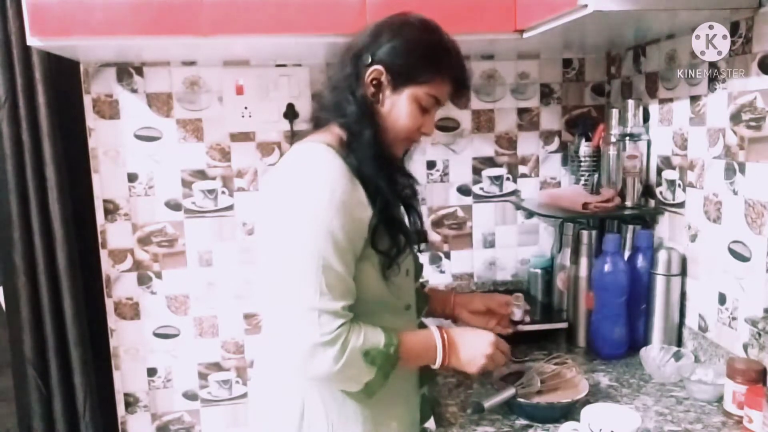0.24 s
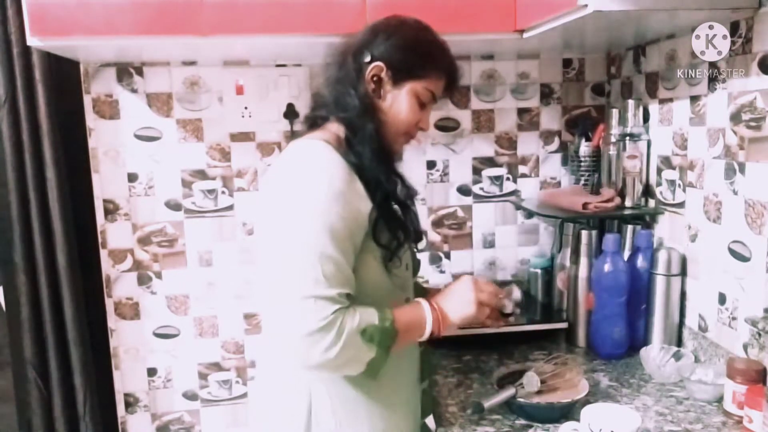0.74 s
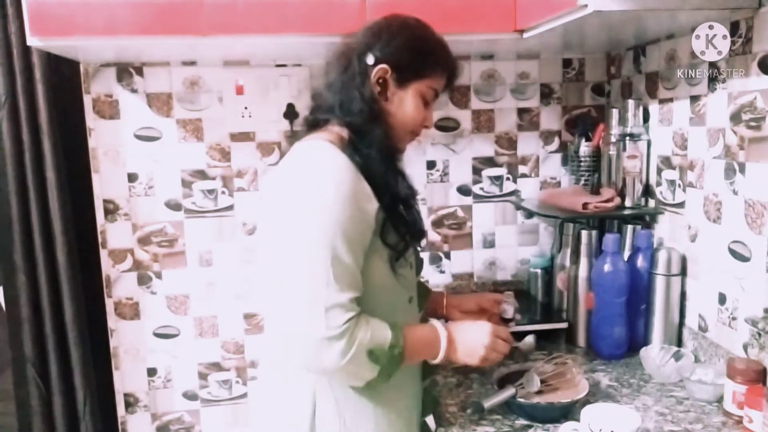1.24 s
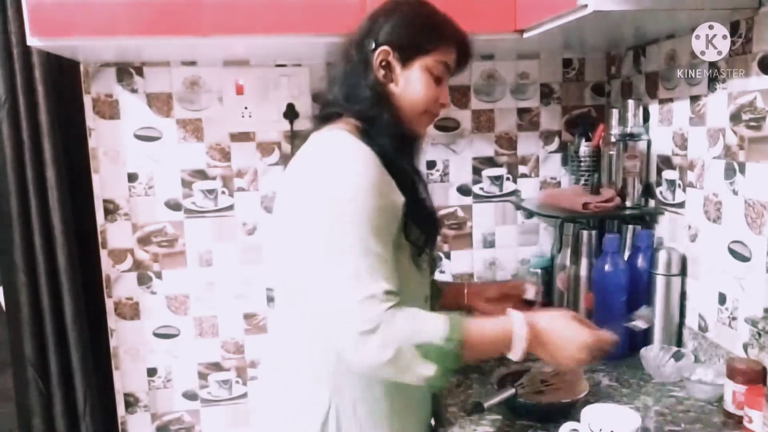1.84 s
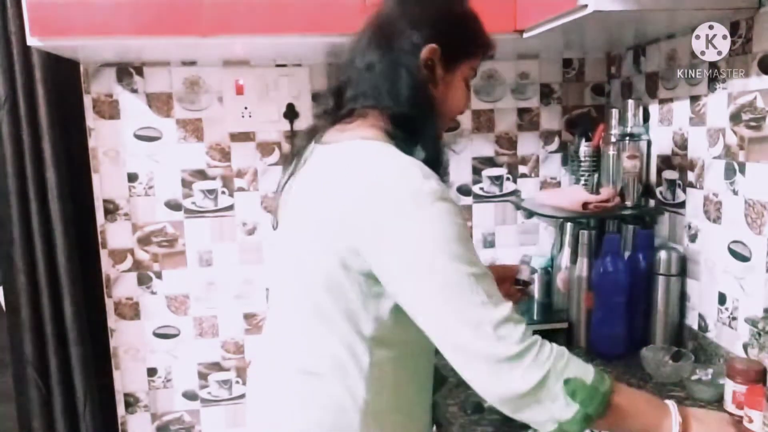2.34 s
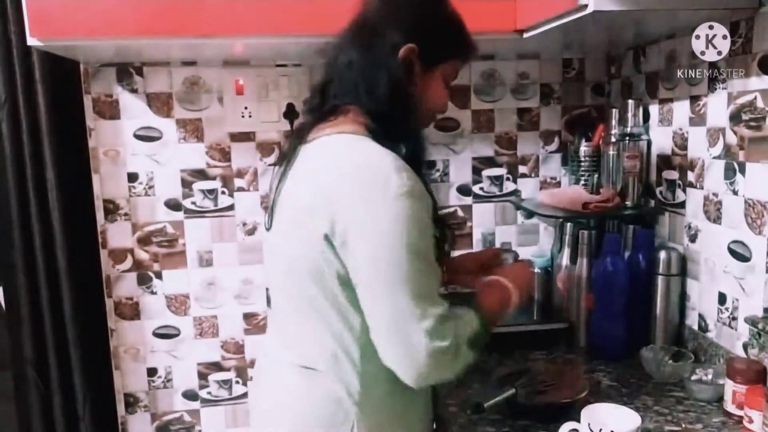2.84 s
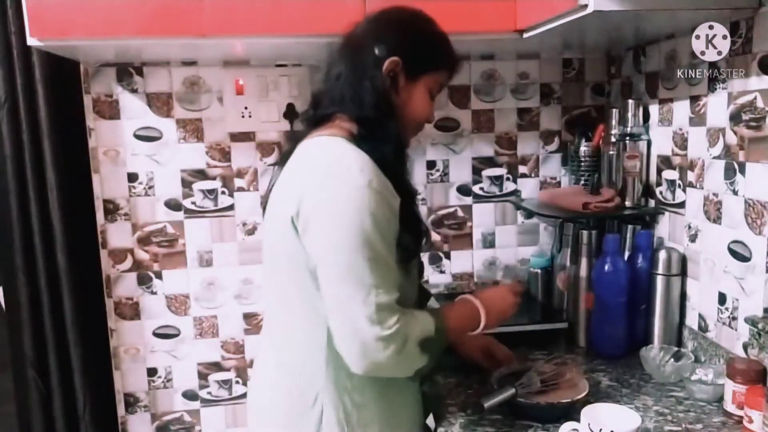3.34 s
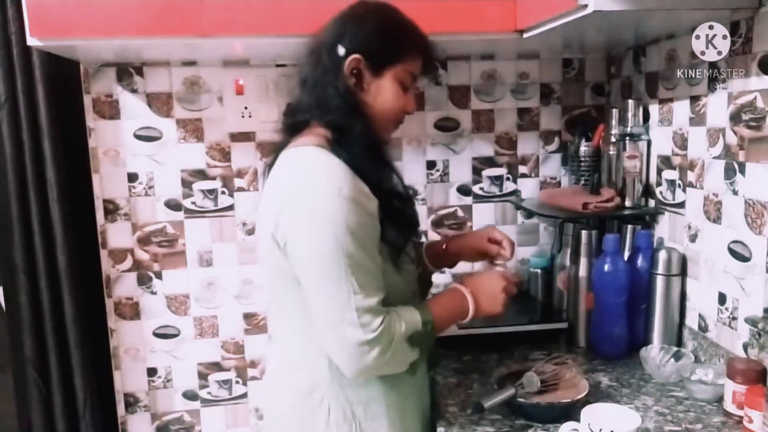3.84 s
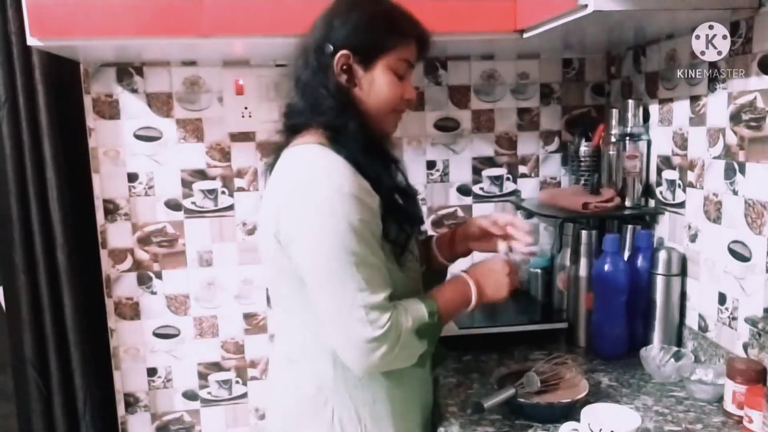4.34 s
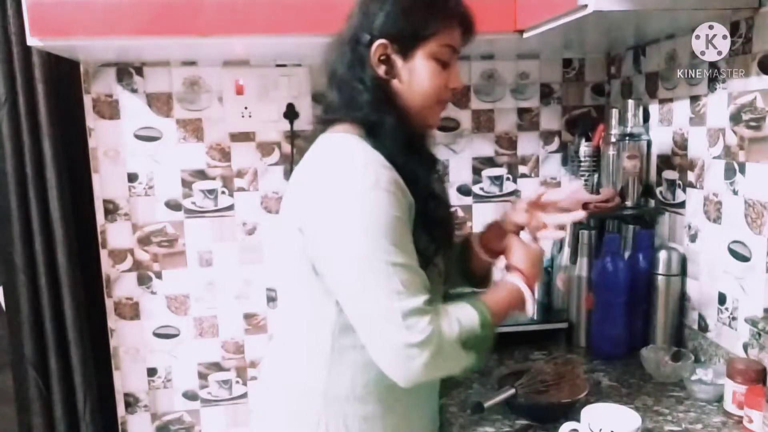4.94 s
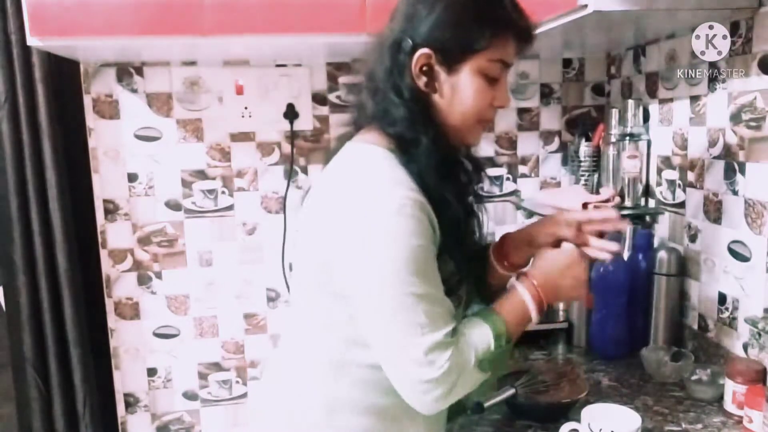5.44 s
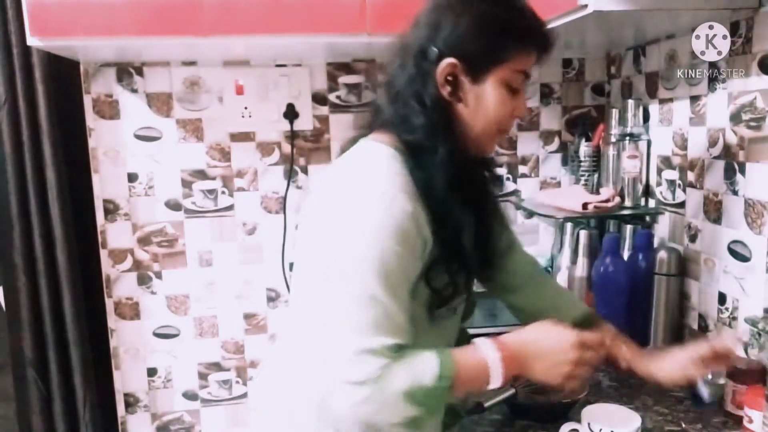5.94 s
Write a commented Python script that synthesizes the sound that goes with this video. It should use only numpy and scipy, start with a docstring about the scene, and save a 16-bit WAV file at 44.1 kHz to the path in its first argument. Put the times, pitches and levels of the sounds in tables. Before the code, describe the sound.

A quiet, bright tiled kitchen with low house hum. Small ticks come first, then a spoon is laid on the stone counter with a hard clack, and a cup follows, rocking briefly. A bottle cap slips and creaks on its thread, with knocks. Then rustling fingers and irregular light ticks continue, ending in a quick sleeve swish. A fairly close stereo microphone catches the short, bright echo.

```python
"""Handling things in a tiled kitchen

A cook handles a spoon, a cup and a small bottle at a stone counter, over a low hum of the house.
Taps are filtered noise bursts; spoon and cup are sums of damped modes; cap slips excite the neck's note.
Rustling cloth and fingers are random grains, and a faint thin sine comes and goes.
Taps, clinks, cap slips and low notes also set off the bright echo of the tiles, a decaying noise."""
import sys
import numpy as np
from scipy import signal
from scipy.fft import rfft, irfft
from scipy.io import wavfile

SR = 44100
rng = np.random.default_rng(int(sys.argv[2]) if len(sys.argv) > 2 else 0)


def master(y):
    """Save y as 16-bit WAV."""
    cut = np.clip(np.atleast_2d(y).T, -1, 1)
    pcm = np.round(cut * 32767)  # scale
    wavfile.write(sys.argv[1], SR, pcm.astype(np.int16))


N = 272979

# House hum: its spectrum (frequency [Hz], relative level [dB per Hz]), its course (time [s], level [dB])
HUM_SPECTRUM = [(15, -9), (25, -8), (32, -14), (40, -13), (52, -15), (75, -9), (100, -13), (125, -15),
                (165, -5), (215, -11), (275, -12), (340, -18), (420, -18), (600, -22), (1800, -35),
                (5000, -45), (8500, -45), (16000, -54)]
HUM_COURSE = [(0.0, -60), (1.17, -61.5), (2.05, -61.5), (3.09, -59.5), (3.88, -61), (4.9, -60), (5.33, -62),
              (6.19, -59.5)]
# Deepest rumble: (frequency [Hz], relative level [dB per Hz])
DEEP_SPECTRUM = [(6, -13), (14, 1), (30, 2.5), (70, -12), (110, -18)]
DEEP_DB, DEEP_LUMPS_DB = -76, 4  # middle level and spread of its wander
# Likeness of the two channels of noise and grains: (frequency [Hz], likeness [0 to 1])
CHANNEL_LIKENESS = [(25, 0.3), (45, 0.45), (70, 0.7), (150, 0.86), (300, 0.6), (600, 0.34), (1000, 0.01)]

# Rubbing of cloth and fingers: (time [s], treble level [dB], lower level [dB])
RUSTLE_COURSE = [(0, -80.5, -78), (.85, -79, -80), (.97, -72, -73), (1.3, -68, -73.5), (1.45, -76.5, -77),
                 (1.77, -64.5, -69), (1.87, -70.5, -72.5), (2.0, -73.5, -70), (2.95, -77, -86),
                 (3.08, -67.5, -67.5), (3.19, -59, -68.5), (3.4, -68.5, -73.5), (3.9, -72.5, -67.5),
                 (3.945, -66, -62), (4.0, -71, -66), (4.035, -62, -56), (4.062, -55, -50), (4.1, -64, -52),
                 (4.285, -71, -65), (4.328, -58, -54), (4.37, -59, -56), (4.45, -63, -60.5),
                 (4.74, -60, -63), (4.9, -60, -70), (5.0, -67, -66.5), (5.05, -64, -65.5),
                 (5.18, -68, -72.5), (5.78, -64.5, -68.5), (5.97, -66.5, -64.5), (6.19, -70, -74)]
# Spectra of the treble, the lower part and the finest hiss: (frequency [Hz], relative level [dB per Hz])
RUSTLE_TREBLE_SPECTRUM = [(2350, -28), (4000, -15), (4490, -14.5), (6510, -7.5), (8460, -7.5), (9670, -7),
                          (10500, -4.5), (12000, -22.5), (15600, -47), (22000, -120)]
RUSTLE_LOWER_SPECTRUM = [(410, -6.5), (700, -2.5), (917, -3), (1010, -2), (1480, 0.5), (3470, 2),
                         (6000, -5), (7800, -8), (13200, -120)]
RUSTLE_AIR_SPECTRUM = [(10500, -52), (12000, -2), (14000, -7), (16000, -10)]
# With the treble at the pivot the finest hiss is at AIR_DB; it follows this share of the treble's swing
AIR_PIVOT_DB, AIR_DB, AIR_FOLLOWS = -71, -81, 0.82
RUSTLE_WANDER_DB = 1.0
# Sleeve sweeping past: (time [s], level [dB])
SWISH_COURSE = [(5.79, -88), (5.825, -59), (5.855, -50.5), (5.895, -54), (5.93, -61.5), (5.99, -70)]
# Its spectrum: (frequency [Hz], relative level [dB per Hz])
SWISH_SPECTRUM = [(3500, -21), (4500, -7.5), (6500, -8), (8500, -5.5), (10500, -6), (12000, -9),
                  (14000, -10), (16000, -14)]

# Faint thin tone: (time [s], level [dB])
WHISTLE_COURSE = [(5.02, -95), (5.12, -77), (5.45, -76), (5.78, -76), (5.86, -95)]
WHISTLE_HZ, WHISTLE_WAVER_HZ = 3390, 3.5

# Decay time of the tile echo: (frequency [Hz], T60 [s])
ECHO_T60 = [(500, 0.61), (1500, 0.67), (4000, 0.55), (8000, 0.42), (14000, 0.43)]
# Lean of the echo: (frequency [Hz], left over right [dB])
ECHO_BALANCE = [(500, 0), (1500, -1), (5000, -3), (9000, -1), (14000, 1)]
ECHO_GRIT_DB, ECHO_GRIT_S = 4.0, 0.042  # single reflections stand out at first, then blend
ECHO_BUILD_MS = 4.0  # the first walls answer after a moment

# Dull low notes, one sounding from the start: (time [s], level [dB], frequency [Hz], T60 [s])
LOW_NOTE_EVENTS = [(0.0, -54.5, 408, 0.12), (2.606, -47, 597, 0.015), (3.447, -43.5, 485, 0.011),
                   (3.47, -49.5, 237.5, 0.15), (4.07, -42.5, 690, 0.013), (4.337, -52, 410, 0.033),
                   (4.338, -49.5, 687, 0.044)]
# Slips of the cap on its thread, the neck's note mostly falling as it opens:
# (time [s], level [dB], frequency [Hz], time scale of the slip [ms])
CAP_SLIPS = [(3.705, -59.5, 1390, 9.2), (3.828, -49.5, 1390, 2.2), (3.921, -47, 1310, 5.6),
             (3.941, -44, 1342, 6.2), (3.975, -48.5, 1310, 5), (4.008, -45, 1280, 4.6),
             (4.044, -47, 1135, 3.1), (4.066, -42, 1060, 2.5), (4.075, -45, 870, 2.8),
             (4.084, -42.5, 1013, 3.9), (4.11, -52, 1046, 3), (4.14, -52, 1050, 3), (4.18, -57, 1040, 3)]
NECK_WIDTH_HZ = 102
CAP_DIRECT_DB, CAP_ECHO_DB = -1.5, -3

# Blows of the spoon laid on stone, with one bounce: (time [s], level [dB])
SPOON_BLOWS = [(2.325, -26.5), (2.328, -26.5)]
# Modes of the spoon: (frequency [Hz], relative level [dB], T60 [s])
SPOON_MODES = [(1510, -28, 0.014), (1750, -8.5, 0.013), (2150, 1.5, 0.01), (2630, -3, 0.013),
               (3350, -8, 0.007), (3740, -11.5, 0.024), (4300, -15, 0.014), (5140, -6, 0.012),
               (5860, -0.5, 0.0085), (7500, 7, 0.011), (8100, 2, 0.0096), (8620, -2, 0.0097),
               (10340, -1.5, 0.013), (13000, -7, 0.0092)]
# Blows of the cup set down, then rocking: (time [s], level [dB])
CUP_BLOWS = [(2.6045, -26), (2.6065, -24), (2.617, -29.5), (2.622, -28), (2.63, -33), (2.636, -38),
             (2.661, -36), (2.668, -38)]
# Modes of the cup: (frequency [Hz], relative level [dB], T60 [s])
CUP_MODES = [(713, -17.5, 0.027), (1017, -11, 0.03), (1194, -11.5, 0.031), (1550, -13, 0.0093),
             (1684, 1.5, 0.018), (1860, -11, 0.015), (2740, -8, 0.017), (3580, -8.5, 0.034),
             (3720, -7, 0.017), (4040, -5, 0.024), (6380, -11, 0.075), (6620, 3.5, 0.018), (7640, -4, 0.03),
             (8250, -1.5, 0.029), (9400, -19, 0.018), (9850, 0.5, 0.02), (10000, -1, 0.033),
             (9940, -6, 0.022), (11400, -7, 0.018), (14200, -23, 0.011)]
BLOW_RISE_MS, BLOW_SPREAD_DB = 0.4, 2.5  # how fast a blow builds; how unevenly it excites the modes
BLOW_DETUNE = 0.012  # spread of a mode's pitch from blow to blow, as a share of the pitch

# Taps, each a bright tick plus a duller knock: (time [s], tick level [dB], knock level [dB],
# note of the thing touched [Hz], left over right [dB], echo feed [dB], weight of the lowest band [dB])
TAP_EVENTS = [(0.489, -69, -75.5, 2340, -8, 5.5, -11), (0.903, -69.5, -86, 2430, -2, 8, 0),
              (0.982, -58.5, -68, 4320, 1, 1.5, -11), (1.0482, -37.5, -58, 4300, -2, 1.5, 3),
              (1.0523, -37, -64, 3020, 0, 0, 7), (1.241, -48.5, -66, 3000, -1, -0.5, 4),
              (2.0262, -49, -66, 4000, -2, -1, -1), (2.133, -47.5, -65, 4860, -3, 7, -10),
              (2.143, -39.5, -61, 5000, -1, -4.5, 1.5), (2.3256, -32, -36, 3620, -4, -3.5, -8),
              (2.6030, -32, -34, 3670, 0, 6, 5.5), (3.444, -56, -60, 3860, 0, 2, 5.5),
              (3.4704, -75, -52, 3200, -1, -2, -6), (3.633, -42.5, -64, 2770, 0, 0, -1),
              (3.8282, -62, -65, 2800, -1, -1, -4), (3.92, -79, -53.5, 4040, -3, 7.5, 1),
              (4.065, -48, -42, 3770, 3, -4, 3.5), (4.0710, -49, -46, 4030, -8, 0.5, 2),
              (4.0760, -55, -48.5, 3670, 8, -0.5, 2), (4.0820, -48, -49, 3830, 0, -1, 1),
              (4.155, -51.5, -62, 2700, -1, -3.5, 2), (4.18, -61, -61, 2750, 2, -9, -3),
              (4.3310, -50, -48.5, 3940, 0, 1.5, -1), (4.3400, -49, -44.5, 3940, -1, -6, 7),
              (4.5313, -55, -54, 2800, -2, -7, 8.5), (4.6397, -56, -58.5, 4470, 0, 2, -13),
              (4.6815, -51, -50, 3210, -7, -1.5, -10), (4.692, -51, -51, 3300, 8, -5, -1),
              (4.699, -55, -57, 3100, -3, -3, -5), (4.7624, -42.5, -61, 3560, -3, -0.5, 0),
              (4.767, -43.5, -60, 3560, -1, -3, -1), (4.7975, -50, -57, 3380, 1, -6, -11),
              (4.8714, -50.5, -62, 3120, -1, -6, -8), (4.9321, -44.5, -60.5, 3600, -1, 0.5, -1),
              (5.0002, -56, -60, 3380, 0, 1.5, -10), (5.071, -56, -67, 3400, 0, 2, -8),
              (5.082, -60, -67, 3500, 1, 0, -13), (5.144, -57, -67, 3400, 4, -6, -3),
              (5.205, -54, -67, 3400, -4, -29, 0), (5.3807, -54.5, -66.5, 3150, 0, 0, -15),
              (5.521, -63, -87, 3360, -3, -7, 0), (6.0925, -53.5, -67.5, 4530, -3, -2, 7)]
# Colour of every tap: (low edge [Hz], high edge [Hz], tick share [dB], knock share [dB])
TAP_COLOUR = [(7500, 9600, -4.5, -16.5), (9450, 11130, -5.5, -18), (720, 2090, -51, -9),
              (2130, 4870, -21, -4.5), (4990, 7360, -10, -11), (11400, 14700, -11.5, -30)]
NOTE_DB = -3.5  # the note against the knock
TICK_MS, KNOCK_MS = 2.53, 4.3  # time scale of each contact

MIC_HZ, MIC_WIDTH_HZ, MIC_LIFT_DB = 8555, 680, 0.5
CUTOFF_HZ = 16850


def amp(db):
    """Decibel law: 20 dB is a factor of ten in amplitude."""
    return 10 ** (np.asarray(db) / 20)


def rms_one(x):
    """Normalisation of power: scale to unit rms."""
    return x / np.sqrt(np.mean(x ** 2) + 1e-20)


def in_time(rows):
    """Linear interpolation in time: each column as one value per sample."""
    s, *columns = np.transpose(rows)
    return [np.interp(np.arange(N) / SR, s, column) for column in columns]


def at_hz(points, hz):
    """Logarithmic frequency axis: interpolate a curve along it."""
    points = np.array(points)
    return np.interp(np.log(hz), np.log(points[:, 0]), points[:, 1])


def band(x, low_hz, high_hz, order=2):
    """Band limitation by a Butterworth band-pass."""
    sos = signal.butter(order, [low_hz, high_hz], "band", fs=SR, output="sos")
    return signal.sosfilt(sos, x + 1e-18)


def resonance(x, hz, width_hz):
    """Two-pole resonance, of unit gain at its peak."""
    r = np.exp(-np.pi * width_hz / SR)
    feedback = [1, -2 * r * np.cos(2 * np.pi * hz / SR), r * r]
    return signal.lfilter([(1 - r * r) / 2, 0, (r * r - 1) / 2], feedback, x)


def drift(rate_hz):
    """Low-passed noise: a slow random wander of unit spread."""
    step = 40  # samples between wander values
    r = np.exp(-2 * np.pi * rate_hz * step / SR)
    noise = rng.standard_normal(N // step + 2002)
    slow = signal.lfilter([1], [1, -2 * r, r * r], noise)[2000:]  # drop the filter's start
    return np.interp(np.arange(N) / step, np.arange(len(slow)), rms_one(slow))


def coloured(source, spectrum):
    """Spectral shaping and mid-side mixing: a partly correlated pair of unit rms."""
    hz = np.maximum(np.arange(N // 2 + 1) * SR / N, 1)
    mid, side = rfft(source)
    likeness = np.clip(at_hz(CHANNEL_LIKENESS, hz), 0, 1)
    mid = np.sqrt(1 + likeness) * mid
    side = np.sqrt(1 - likeness) * side
    inside = (hz >= spectrum[0][0]) & (hz <= spectrum[-1][0])
    gain = amp(at_hz(spectrum, hz)) * inside
    return rms_one(irfft(gain * np.array([mid + side, mid - side]), N))


def grains(rate, spread_db):
    """Random impulse process: grains of random size and sign, rate per second in each channel."""
    sizes = amp(spread_db * np.minimum(rng.exponential(1, (2, N)), 4))
    signs = rng.choice([-1, 1], (2, N))
    return sizes * signs * (rng.random((2, N)) < rate / SR)


def touch(noise, ms):
    """Transient contact: a noise burst of quick rise and slower fall, its spectrum evened out."""
    x = 1000 * np.arange(noise.shape[-1]) / SR / max(ms, .2)
    burst = noise * x * np.exp(1 - x)
    spectrum = rfft(burst)
    even = irfft(spectrum / (np.abs(spectrum) + 1e-12), len(x)) * np.exp(-(x / 5) ** 2)
    return even * np.sqrt(np.sum(burst ** 2) / np.sum(even ** 2))  # keep the burst's energy


def ring(s, db, hz, t60, rise_ms=0.29):
    """Damped oscillation: a blow sets one mode ringing; the contact takes a moment to build."""
    out, at = np.zeros(N), round(s * SR)
    t = np.arange(min(N - at, int(2 * t60 * SR))) / SR
    rise = 1 - np.exp(-1000 * t / max(rise_ms, .05))
    decay = amp(db - 60 * t / t60)
    out[at:at + len(t)] = rise * decay * np.sin(2 * np.pi * hz * t)
    return out


def hum():
    """Stationary noise: low rumble of the house with a soft hiss above, wavering a little."""
    (level_db,) = in_time(HUM_COURSE)
    return amp(level_db + 0.46 * drift(5.3)) * coloured(rng.standard_normal((2, N)), HUM_SPECTRUM)


def deep():
    """Amplitude modulation: a slow random wander makes soft lumps of the deepest rumble."""
    level_db = DEEP_DB + DEEP_LUMPS_DB * drift(3.5)
    return amp(level_db) * coloured(rng.standard_normal((2, N)), DEEP_SPECTRUM)


def whistle():
    """Frequency modulation: a thin sine wavers in pitch and level, heard only for a while."""
    (db,) = in_time(WHISTLE_COURSE)
    t = np.arange(N) / SR
    heard = (t > WHISTLE_COURSE[0][0]) & (t < WHISTLE_COURSE[-1][0])
    hz = WHISTLE_HZ + WHISTLE_WAVER_HZ * drift(8.0)
    return heard * amp(db + 1.5 * drift(9)) * np.sin(2 * np.pi * np.cumsum(hz) / SR)


def rustle(rate, spread_db):
    """Friction noise: dense tiny grains in a bright part, a duller part and the finest hiss."""
    treble_db, lower_db = in_time(RUSTLE_COURSE)
    air_db = AIR_DB + AIR_FOLLOWS * (treble_db - AIR_PIVOT_DB)
    treble = amp(treble_db) * coloured(grains(rate, spread_db), RUSTLE_TREBLE_SPECTRUM)
    lower = amp(lower_db) * coloured(grains(rate, spread_db), RUSTLE_LOWER_SPECTRUM)
    air = amp(air_db) * coloured(grains(rate, spread_db), RUSTLE_AIR_SPECTRUM)
    return amp(RUSTLE_WANDER_DB * drift(2.1)) * (treble + lower + air)


def swish(rate, spread_db):
    """Friction noise: one bright, gritty sweep of a sleeve."""
    (db,) = in_time(SWISH_COURSE)
    t = np.arange(N) / SR
    heard = (t > SWISH_COURSE[0][0]) & (t < SWISH_COURSE[-1][0])
    return heard * amp(db) * coloured(grains(rate, spread_db), SWISH_SPECTRUM)


def tiles(x, build_ms, level_db):
    """Reverberation: convolution with noise that builds fast and dies band by band in each channel."""
    t = np.arange(SR) / SR
    reflections = np.minimum(rng.exponential(1, (2, SR)), 5) - 1.5
    grit = amp(ECHO_GRIT_DB * np.exp(-t / ECHO_GRIT_S) * reflections)
    white = grit * rng.standard_normal((2, 2, SR))  # two stereo noises, for alternate bands
    echo = np.zeros((2, SR))
    edges = 200 * 2 ** np.arange(0, 6.6, .5)  # half octaves
    for k, (low_hz, high_hz) in enumerate(zip(edges, edges[1:])):
        hz = np.sqrt(low_hz * high_hz)
        lean = amp(at_hz(ECHO_BALANCE, hz) * np.array([[.5], [-.5]]))
        decay = amp(-60 * t / at_hz(ECHO_T60, hz))
        echo += lean * band(white[k % 2], low_hz, high_hz) * decay
    echo *= 1 - np.exp(-1000 * t / build_ms)
    return amp(level_db) * signal.fftconvolve(x[None], echo, axes=1)[:, :N]


def low_notes():
    """Damped oscillation: each dull low note is a single mode."""
    return sum(ring(*row) for row in LOW_NOTE_EVENTS)


def cap():
    """Resonator excitation: each slip is a rough puff ringing in the bottle neck."""
    length = SR // 8
    out = np.zeros(N)
    for s, db, hz, ms in CAP_SLIPS:
        puff = touch(rng.standard_normal(length), ms)
        note = resonance(resonance(puff, hz, NECK_WIDTH_HZ), hz, NECK_WIDTH_HZ)
        at = round(s * SR)
        out[at:at + length] += amp(db) * note / np.abs(note).max()
    return out


def struck(blows, modes):
    """Modal superposition: every blow rings all modes in slightly other shares and pitches."""
    out = np.zeros(N)
    for s, blow_db in blows:
        for hz, mode_db, t60 in modes:
            share, off = rng.standard_normal(2)
            db = blow_db + mode_db + BLOW_SPREAD_DB * share
            out += ring(s, db, hz * (1 + BLOW_DETUNE * off), t60, BLOW_RISE_MS)
    return out


def taps(body_width_hz):
    """Impact excitation: tick and knock share six bands, the knock rings a note; pair and echo feed."""
    length = SR // 8
    out = np.zeros((3, N + length))
    for s, tick_db, knock_db, body_hz, pan_db, echo_db, weight_db in TAP_EVENTS:
        tick = amp(tick_db) * touch(rng.standard_normal((2, length)), TICK_MS)
        knock = amp(knock_db) * touch(rng.standard_normal((2, length)), KNOCK_MS)
        # the square roots make up for the power lost to narrow filters
        note = np.sqrt(SR / np.pi / body_width_hz) * resonance(knock, body_hz, body_width_hz)
        sound = amp(NOTE_DB) * note
        for low_hz, high_hz, tick_share_db, knock_share_db in TAP_COLOUR:
            burst = amp(tick_share_db) * tick + amp(knock_share_db) * knock
            gain = np.sqrt(SR / 2 / (high_hz - low_hz))
            if low_hz < 1000:  # the lowest band
                gain *= amp(weight_db)
            sound += gain * band(burst, low_hz, high_hz, order=4)
        at = round(s * SR)
        levels_db = [[pan_db / 2], [-pan_db / 2], [echo_db]]
        out[:, at:at + length] += amp(levels_db) * sound[[0, 1, 0]]  # left, right, echo feed
    return out[:2, :N], out[2, :N]


def scene():
    """Superposition of background, rustle, counter sounds and their echo."""
    rubbing = rustle(rate=5000.0, spread_db=2.0) + swish(rate=4800.0, spread_db=-2.0)
    background = amp([[-.4], [.4]]) * (hum() + deep() + rubbing) + whistle()
    low = low_notes()
    slips = cap()
    rung = struck(SPOON_BLOWS, SPOON_MODES) + struck(CUP_BLOWS, CUP_MODES)
    tapped, tap_feed = taps(body_width_hz=350.0)
    feed = tap_feed + rung + amp(CAP_ECHO_DB) * slips + amp(3.0) * low
    echo = tiles(feed, build_ms=ECHO_BUILD_MS, level_db=-28)
    direct = tapped + amp([[-5.0], [-2.5]]) * rung + amp(CAP_DIRECT_DB) * slips + low
    return background + direct + echo


def record(dry):
    """Port resonance: the microphone port lifts the treble around it; a steep low-pass cuts the top."""
    wet = dry + amp(MIC_LIFT_DB) * resonance(dry, MIC_HZ, MIC_WIDTH_HZ)
    return signal.sosfilt(signal.cheby2(12, 70, CUTOFF_HZ, fs=SR, output="sos"), wet)


dry = scene()
out = record(dry)
master(out)
```